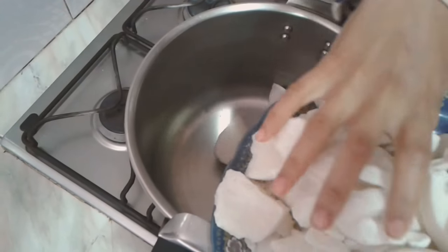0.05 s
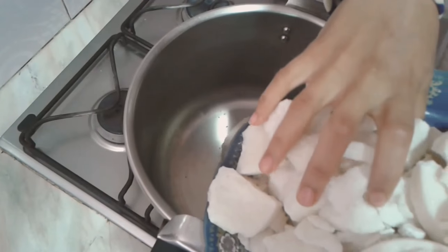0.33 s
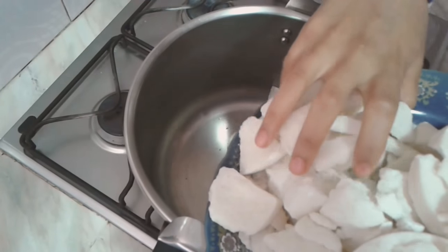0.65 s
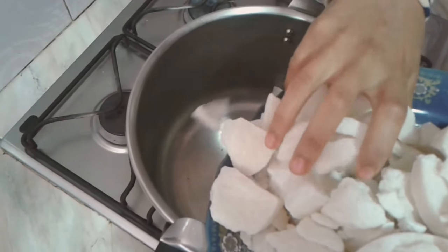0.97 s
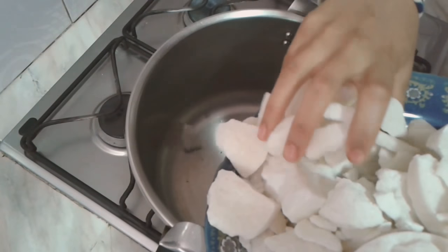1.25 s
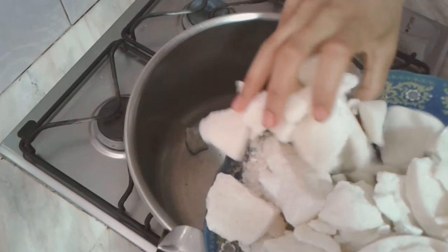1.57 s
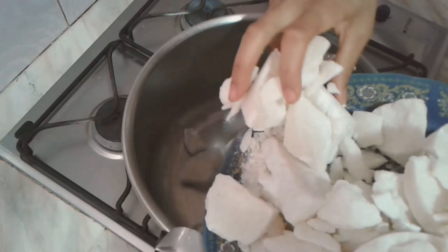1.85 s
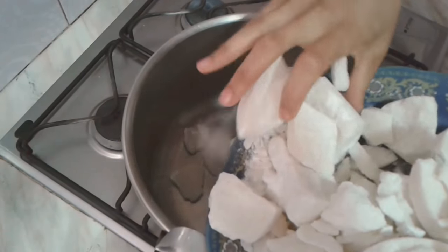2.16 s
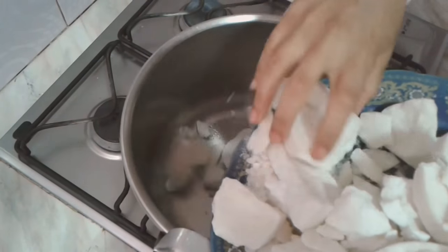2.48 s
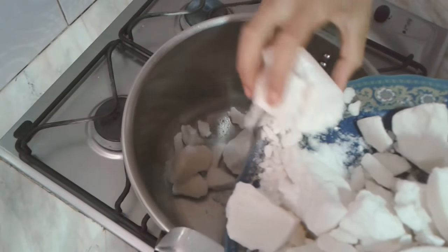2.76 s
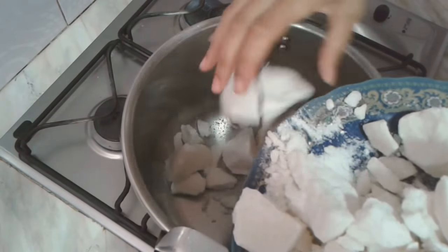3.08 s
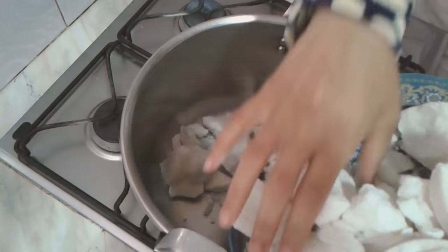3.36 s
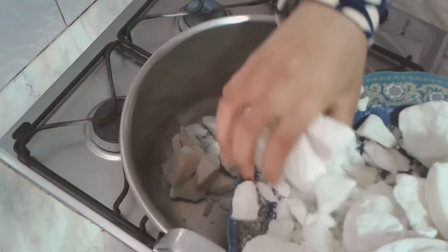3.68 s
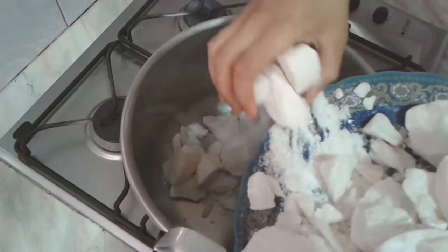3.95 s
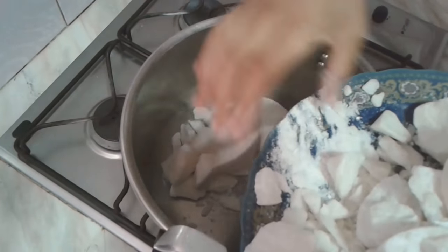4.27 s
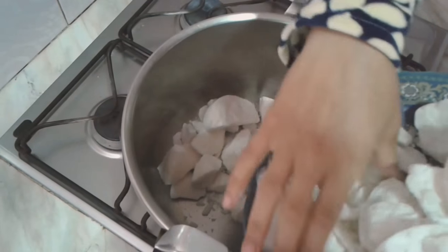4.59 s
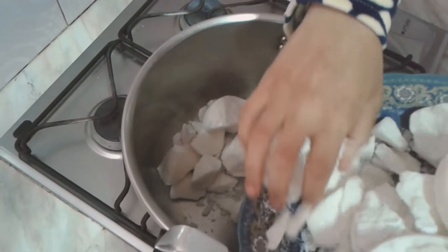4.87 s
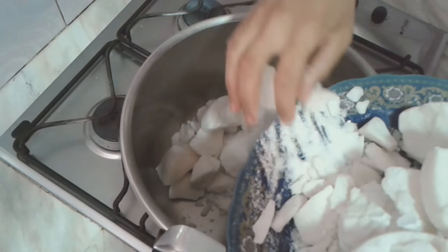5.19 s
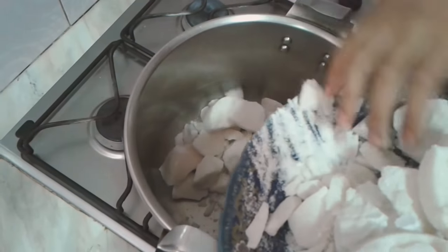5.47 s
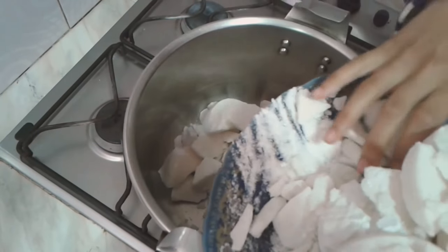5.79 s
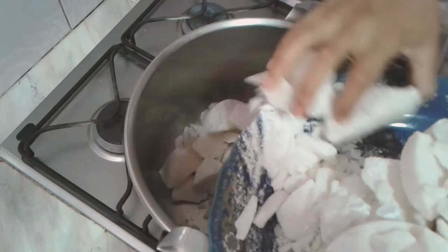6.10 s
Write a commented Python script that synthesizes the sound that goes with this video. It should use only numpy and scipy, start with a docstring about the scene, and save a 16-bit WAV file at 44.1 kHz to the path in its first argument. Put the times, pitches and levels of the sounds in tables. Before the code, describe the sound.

Hard sugar chunks grind and clack across a plate, then tumble into a steel pot with sharp clinks and short metallic rings.

```python
"""A small tiled kitchen: a hand pushes hard chunks of sugar off a plate into a steel pot on the stove.
The chunks grind, clack against each other and squeak on the glaze while loose crumbs trickle down.
Each falling chunk cracks and rings the pot, which dulls as it fills. Now and then the plate knocks
on the rim with a hollow thump. The open pot and the tiles answer with short echoes."""
import sys
import numpy as np
from scipy import signal
from scipy.fft import rfft, irfft, next_fast_len
from scipy.io import wavfile
from scipy.ndimage import uniform_filter1d, map_coordinates

SR = 44100
rng = np.random.default_rng(int(sys.argv[2]) if len(sys.argv) > 2 else 0)


def unload_wav(signal):
    """Save mono or channel-first audio to the path in sys.argv[1] as 16-bit WAV at rate SR, clipped to [-1, 1]."""
    wavfile.write(
        sys.argv[1],
        SR,
        np.round(np.clip(np.atleast_2d(signal).T, -1, 1) * 32767).astype(np.int16),
    )


N = 270553
RING_TIME = np.arange(SR // 2) / SR

# spectrum of a full heap of chunks rubbing together: f/Hz, level/dB
FULL_HEAP_SPECTRUM = [(40, -41), (120, -40), (200, -13.5), (270, -23.5), (345, -13.5), (480, -27.5),
                      (800, -10.5), (1100, -13.5), (1750, -13.5), (2230, -4.5), (2600, -6.5), (3100, -16),
                      (4500, -29), (9000, -55)]
# bright spectrum of sugar grit: f/Hz, level/dB
GRIT_SPECTRUM = [(1500, -5.5), (3400, 0.5), (4900, -3), (6700, 6), (7700, 0), (8400, 6), (9500, -4),
                 (11900, 1), (13400, -4), (16000, -14.5)]


def amp(db):
    return 10 ** (np.asarray(db) / 20)


def unit(x):
    return x / np.sqrt(np.mean(x ** 2) + 1e-20)


def fade(t60):
    """A decay that loses 60 dB in t60 seconds."""
    return np.exp(-np.log(1000) * RING_TIME / t60)


def along(points, hz):
    """Read a curve of (f/Hz, value) points on a log frequency axis."""
    f, value = np.transpose(points)
    return np.interp(np.log(hz + 1), np.log(f), value)


def add(track, s, sound):
    """Mix a sound in at s seconds."""
    start = max(round(s * SR), 0)
    track[start:start + len(sound)] += sound[:N - start]


def colour(x, spectrum):
    """Minimum-phase EQ through (f/Hz, level/dB) points; the result has rms 1."""
    size = 2 ** 12
    gain = amp(along(spectrum, np.fft.rfftfreq(size, 1 / SR)))
    cepstrum = irfft(np.log(gain))
    cepstrum[1:size // 2] *= 2
    cepstrum[size // 2 + 1:] = 0
    impulse = irfft(np.exp(rfft(cepstrum)))
    return unit(signal.fftconvolve(x, impulse)[:len(x)])


def burst(spectrum):
    """Half a second of coloured noise."""
    return colour(rng.standard_normal(len(RING_TIME)), spectrum)


def crest(x):
    """Scale a blow so that its loudest 3 ms have rms 1."""
    return x / np.sqrt(uniform_filter1d(x ** 2, 132).max())


def voice(blow, edges_hz, levels_db):
    """Where and how hard a blow lands sets the strength of each register."""
    registers = [signal.butter(3, band, 'band', fs=SR, output='sos')
                 for band in zip(edges_hz, edges_hz[1:])]
    return sum(amp(db) * crest(signal.sosfilt(sos, blow)) for sos, db in zip(registers, levels_db))


def ring(modes, scatter_db, damping=1):
    """Modes (f/Hz, level/dB, t60/s) struck anew by every blow; damping divides their ring time."""
    hz, db, t60 = np.transpose(modes)[:, :, None]
    gain = amp(db + scatter_db * rng.standard_normal(hz.shape))
    phase = 2 * np.pi * (hz * RING_TIME + rng.random(hz.shape))
    waves = np.sin(phase.astype(np.float32)) * fade(t60 / damping)
    return np.sum(gain * waves, axis=0) / np.linalg.norm(gain)


def grains(per_s, top_hz, t60, spread_db):
    """Tiny fractures at random moments, each with its own size and briefly ringing pitch."""
    when, pitch, size, phase = rng.random((4, int(per_s * N / SR), 1))
    age = np.arange(int(t60 * SR))
    gain = amp(spread_db * np.minimum(-np.log(size), 3))
    waves = gain * np.sin(2 * np.pi * (top_hz * pitch * age / SR + phase)) * fade(t60)[age]
    positions = (when * N).astype(int) + age
    return unit(np.bincount(positions.ravel(), waves.ravel(), minlength=N)[:N])


def strokes(rows, attack_s, release_t60):
    """Envelope of movements that each swell, hold and die away."""
    start, length, db = np.transpose(rows)[:, :, None]
    age = np.arange(N) / SR - start
    swell = np.clip(age / attack_s, 0, 1)
    release = np.exp(-np.log(1000) * np.clip((age - length) / release_t60, 0, 2))
    return np.linalg.norm(amp(db) * swell * release, axis=0)


def wobble(knots_per_s):
    """A smooth random curve."""
    return map_coordinates(rng.standard_normal(N // 100), [np.arange(N) * knots_per_s / SR])


def grinding(t, emptied, plate_db=1, chips_db=-10):
    """Rough faces slip and small edges chip off; the heap sounds higher as the plate empties."""
    # spectrum of the last few chunks: f/Hz, level/dB
    thin_heap_spectrum = [(40, -21), (260, -36), (355, -11), (500, -20.5), (850, -15), (1100, -15.5),
                          (1750, -19), (2450, 0.5), (2700, -11), (3000, -14.5), (4500, -27.5), (9000, -42)]
    # modes of the glazed plate: f/Hz, level/dB, t60/s before damping
    plate_modes = [(2270, 4.5, 0.023), (2480, -22, 0.027), (2740, 6, 0.042), (3200, -4, 0.027),
                   (3550, -4, 0.05), (4310, -14.5, 0.059), (6830, -12, 0.03), (11100, -11, 0.035)]
    slips = grains(per_s=1300, top_hz=4500, t60=.006, spread_db=4.5)
    heap = np.sqrt(1 - emptied) * colour(slips, FULL_HEAP_SPECTRUM)
    heap += np.sqrt(emptied) * colour(slips, thin_heap_spectrum)
    # for a moment the chunks drag over bare glaze, and the plate sings
    bare = np.interp(t, [4.5, 4.7, 5.3, 5.45], [0, .75, .75, 0])
    drag = grains(per_s=2500, top_hz=13000, t60=.002, spread_db=4)
    plate = signal.fftconvolve(drag, ring(plate_modes, scatter_db=1, damping=1.3))[:N]
    plate = colour(plate, [(100, -20), (2000, 0)])
    chips = grains(per_s=130, top_hz=7000, t60=.005, spread_db=5.5)
    chips = colour(chips, [(400, -20), (1500, -2), (3500, 0), (7000, -5)])
    return np.sqrt(1 - bare) * heap + np.sqrt(bare) * amp(plate_db) * plate + amp(chips_db) * chips


def crystals(chips_db=-3, ticks_db=8):
    """Fine sand, crumbly ticks and tinkling chips stir the crowded high modes of the steel."""
    sand = grains(per_s=3000, top_hz=18000, t60=.0015, spread_db=4)
    ticks = grains(per_s=300, top_hz=16000, t60=.002, spread_db=5)
    chips = grains(per_s=2000, top_hz=16000, t60=.009, spread_db=5)
    shower = unit(sand + amp(ticks_db) * ticks + amp(chips_db) * chips)
    high_modes = [(hz, 0, .05) for hz in rng.uniform(3500, 16500, 90)]
    steel = unit(signal.fftconvolve(shower, ring(high_modes, scatter_db=2))[:N])
    return colour(shower + .55 * steel, GRIT_SPECTRUM)


def slide(grind_db=-1, grit_db=-2, powder_db=-5, rest_db=-51.5, fits_db=2,
          shed_db=-14, shed_db_per_s=1.22):
    """The pushed heap grinds in fits, shedding more and more grit as its crumbs are uncovered."""
    # the hand shoving the heap along the plate: t/s, length/s, level/dB
    pushes = [(0, 0.32, -48.5), (.5, 0.26, -38), (.83, .3, -36), (1.27, 0.33, -36.5), (1.57, .3, -28),
              (2.04, 0.14, -31), (2.33, 0.044, -27), (2.66, 0.1, -37.5), (2.83, 0.062, -47),
              (3.12, 0.015, -36), (3.49, 0.31, -43.5), (3.8, 0.46, -42), (4.58, 0.483, -32),
              (4.7, 0.14, -29.5), (5.06, .3, -37), (5.22, 0.032, -27.5), (5.42, 0.15, -33.5),
              (5.73, 0.056, -42), (5.85, 0.24, -31)]
    # loose crumbs trickling into the pot: t/s, length/s, level/dB
    spills = [(0, 0.39, -59.5), (.5, .22, -52), (.84, 0.062, -49), (1.22, 0.028, -29), (2.64, 0.053, -43),
              (2.83, 0.059, -44), (3.11, 0.19, -44), (3.66, 0.029, -35), (3.86, 0.43, -39),
              (4.19, 0.036, -29.5), (4.36, 0.15, -29.5), (5.22, 0.056, -35.5), (5.62, 0.02, -31)]
    # spectrum of the finest crumbs: f/Hz, level/dB
    powder_spectrum = [(2000, -10), (5500, -1), (8500, -6), (10000, -5), (11700, 3), (15500, -10)]
    t = np.arange(N) / SR
    emptied = np.clip((t - 2.4) / 4.02, 0, 1)
    push = strokes(pushes, attack_s=.017, release_t60=.12)
    push = np.hypot(push, amp(rest_db))  # the heap creaks even under a resting hand
    push *= amp(fits_db * wobble(knots_per_s=40))  # rough faces catch and slip
    spill = strokes(spills, attack_s=.011, release_t60=.36)
    grit_flow = np.hypot(amp(shed_db + shed_db_per_s * t) * push, spill)
    grind = amp(grind_db) * push * grinding(t, emptied)
    # powder lies under the chunks and runs out with the crumbs once it is uncovered
    dust = grains(per_s=3000, top_hz=17000, t60=.004, spread_db=4)
    powder = amp(powder_db) * spill * np.sqrt(emptied) * colour(dust, powder_spectrum)
    return grind + amp(grit_db) * grit_flow * crystals() + powder


def chunk_ring():
    """Every chunk has a shape of its own, and so a few short pitches of its own."""
    return ring([(hz, 0, .035) for hz in rng.uniform(2500, 12000, 8)], scatter_db=3)


def clacks(tone_db=-2.5, snap_db=-5, rattle_db=-18):
    """Sugar on sugar, or a chunk tapping the plate: a dry, pitched snap, a bright crack and a brief rattle of
    the heap."""
    # chunks clacking against each other (near 2.3 kHz) or tapping the plate (near 1 kHz): t/s, level/dB, f/Hz,
    # crack/dB relative to the level
    collisions = [(0.024, -23.5, 2330, -29), (0.175, -25, 2300, -32), (0.2403, -15.5, 2250, -36),
                  (0.508, -24.5, 940, -21), (0.684, -15.5, 920, -17), (0.77, -23.5, 2370, -10.5),
                  (0.807, -29.5, 2740, 5), (0.844, -23, 2700, -21), (0.91, -7.5, 2380, -18.5),
                  (0.986, 3.5, 2280, -30.5), (1.1843, 2.5, 1390, -32), (1.482, -19, 2470, -37),
                  (1.528, -16, 2190, -24), (1.607, -10, 2250, -27), (1.636, -6, 2140, -30),
                  (1.681, -8, 2200, -21), (1.704, -5.5, 2180, -23), (1.761, -6.5, 2250, -29),
                  (1.791, -21, 2380, -12), (1.819, -2.5, 2170, -18), (1.835, -7.5, 2530, -37),
                  (2.161, -4, 2360, -19), (2.541, -20, 2380, -15.5), (3.081, -17.5, 1390, -17),
                  (3.477, -9, 2680, -17), (3.771, -7.5, 3120, -19.5), (3.828, -19, 2840, -4),
                  (4.148, -13.5, 2300, -28), (4.709, -9, 2180, -14), (4.735, -6, 2750, -20),
                  (4.81, -11, 3050, -9), (5.383, -16.5, 2400, -17), (5.415, -14, 1080, -17),
                  (5.445, -17, 1090, -13.5), (5.458, -9.5, 1000, -20), (5.49, -6, 1030, -9),
                  (5.732, -13, 2000, -24), (5.999, -10.5, 2600, -24), (6.097, -24, 2530, -35),
                  (6.109, -12, 2630, -19)]
    track = np.zeros(N)
    for s, db, hz, crack_db in collisions:
        tone = np.sin(2 * np.pi * hz * RING_TIME) * (fade(.01) - fade(.001))
        snap = burst([(200, -81), (500, -11), (900, 16.5), (3000, 16.5), (7000, -46.5)]) * fade(.0064)
        rattle = burst(FULL_HEAP_SPECTRUM) * fade(.048)
        crack = crest(burst(GRIT_SPECTRUM) * (fade(.024) + .12 * fade(.28)) + chunk_ring())
        body = amp(tone_db) * tone + amp(snap_db) * snap + amp(rattle_db) * rattle
        add(track, s, amp(db) * (body + amp(crack_db) * crack))
    return track


def squeaks(level_db=-3):
    """A sharp edge skids over the glaze with a thin, narrow whistle."""
    # edges skidding: t/s, level/dB, f/Hz
    skids = [(0.265, -39.5, 10300), (0.604, -27.5, 10200), (3.827, -19.5, 12200), (4.367, -19, 12350),
             (5.079, -23, 11500), (5.4484, -27, 11000), (5.4727, -18.5, 11340), (5.484, -17, 11300),
             (5.506, -10.5, 11400), (5.535, -15, 11500)]
    track = np.zeros(N)
    for s, db, hz in skids:
        whistle = burst([(hz * .9, -40), (hz * .98, -8), (hz, 0), (hz * 1.02, -8), (hz * 1.1, -40)])
        add(track, s, amp(db + level_db) * crest(whistle * fade(.0099)))
    return track


def drops(chunk_db=-6, crack_db=4, shimmer_db=-10, thud_db=-23, wall_db=-2, bottom_db=7,
          damping_per_s=.14, cover_db_per_s=3.5, firm_blow_db=-7.5):
    """A landing chunk cracks, then the pot rings: a few clear modes over many faint ones."""
    # chunks landing: t/s, level/dB, sharpness/dB (+ a corner chinks, - a flat face clangs)
    landings = [(1.182, -8, -4), (1.211, -4.5, 11), (1.285, -16, 1.5), (1.365, -12, -10),
                (1.395, -14.5, -13), (1.873, -20.5, 11), (1.899, -8, 7.5), (1.927, -8, -9),
                (1.938, -0.5, -13), (1.952, -2.5, -4.5), (1.967, -14, 7), (1.984, -4, 9), (1.993, -11, -6),
                (2.004, -10.5, 0.5), (2.026, -12, -2), (2.111, -17.5, -22), (2.118, -15, 8),
                (2.282, -11.5, 7.5), (2.3, -10.5, -9), (2.309, -10, 1.5), (2.333, -10, -1.5),
                (2.41, -20.5, -10), (2.422, -14.5, 3), (2.448, -20, -1), (2.573, -5.5, 2.5),
                (2.591, -7, -1.5), (2.619, -11.5, 27), (2.639, -13, 2.5), (2.654, -19, 5),
                (2.821, -22.5, -11), (2.983, -20.5, 13), (3.265, -17.5, 21), (3.268, -12.5, 1),
                (3.287, -13.5, -3), (3.294, -7, -15), (3.316, -8.5, -8.5), (3.34, -11.5, -9.5),
                (3.398, -19.5, -13.5), (3.652, -11.5, -6), (4.365, -17, -19), (4.378, -10, -27),
                (4.401, -4.5, -8.5), (4.414, -7.5, -23), (4.431, -9, -10), (4.479, -21, 20),
                (4.494, -13.5, 1.5), (4.533, -14.5, -14), (4.542, -8.5, -5.5), (4.583, -15.5, 0.5),
                (4.809, -15, 20), (5.211, -8.5, -12), (5.477, -12.5, -5), (5.49, -8, -13), (5.548, -15, 4),
                (5.608, -4.5, 41)]
    # boom against the clang, rising as a bed of sugar builds, easing once it is deep: t/s, level/dB
    boom_curve = [(1.2, -30), (2.4, -10.5), (3.2, -3.5), (4.4, -5.5)]
    # spectrum of the noisy crash of sugar on steel: f/Hz, level/dB
    crash_spectrum = [(24, -52), (40, -35), (337, -9), (516, -37), (790, -11.5), (1150, -21.5),
                      (1340, -10.5), (1590, -17), (2570, -9), (3300, -23.5), (4570, -18.5), (5050, -29),
                      (6650, -16.5), (9220, -31), (16000, -31)]
    # modes of the pot's wall and of its bare bottom: f/Hz, level/dB, t60/s before damping
    wall_modes = [(755, -7, .16), (800, -3, .18), (851, -8, .25), (930, -6, .1), (1047, -7, .2),
                  (1420, -4, .2), (1749, -6, .25), (1883, -6, .18), (2019, -6, .16), (2238, -1, .17),
                  (2600, -5, .2), (3091, -8, .18), (3531, -6, .14), (4076, -7, .14), (5570, -11, .16),
                  (6350, -7, .17), (6697, -9, .11), (6848, -7, .12), (7305, -11, .2), (7556, -10, .16),
                  (8130, -10, .12)]
    bottom_modes = [(1270, -3, .07), (1346, 0, .24), (1385, -1, .11), (3540, -11, .08), (4544, -7, .12)]
    track = np.zeros(N)
    for s, db, sharp_db in landings:
        clang_db, chink_db = db - max(sharp_db, 0), db + min(sharp_db, 0)
        boom_db = clang_db + np.interp(s, *np.transpose(boom_curve))
        boom_db += .94 * (clang_db - firm_blow_db)  # harder blows boom out of proportion
        damping = .9 + damping_per_s * s  # the growing pile damps the steel
        decay = amp(crack_db) * fade(.022) + fade(.055) + amp(shimmer_db) * fade(.17 / damping)
        crash = burst(crash_spectrum) * decay
        wall = amp(wall_db) * ring(wall_modes, scatter_db=0, damping=damping)
        # a flat face rings the bottom best; it fades as the sugar covers it
        bottom_gain = amp(bottom_db - cover_db_per_s * s - .22 * sharp_db)
        bottom = bottom_gain * ring(bottom_modes, scatter_db=5, damping=damping)
        blow = crash + wall + bottom + amp(chunk_db) * chunk_ring()
        levels_db = (db + thud_db, boom_db, clang_db, chink_db)
        add(track, s, voice(blow, (30, 700, 1100, 3500, 17000), levels_db))
    return track


def knocks(modes_db=-1, chink_db=-5):
    """The heavy plate rocks the whole pot with a hollow thump."""
    # the plate bumping the rim: t/s, clang level/dB, thump/dB relative to the clang
    bumps = [(3.005, -27, -5), (3.027, -22.5, -12.5), (3.041, -31, -8), (3.595, -22, -3.5),
             (4.337, -24.5, -10), (5.017, -16.5, -7.5), (5.209, -30, -3)]
    # plate and pot rocking together on the grate: f/Hz, level/dB, t60/s
    rocking_modes = [(333, 0, .17), (374, 1, .18), (463, -6, .14), (540, -7, .06), (790, -4, .13),
                     (931, -6, .25), (1125, -8, .11), (1443, -9, .14), (2230, -3, .14)]
    contact_spectrum = [(230, -1), (350, 1.5), (900, 1.5), (2400, -.5), (7000, -6), (16000, -22.5)]
    track = np.zeros(N)
    for s, db, thump_db in bumps:
        contact = burst(contact_spectrum) * (2 * fade(.009) + fade(.12))
        blow = contact + amp(modes_db) * ring(rocking_modes, scatter_db=1)
        add(track, s, amp(db) * voice(blow, (160, 700, 3500, 17000), (thump_db, 0, chink_db)))
    return track


def pot_echo(x, t60=.045):
    """Sound bounces to and fro inside the open pot."""
    echoes = np.pad(burst(GRIT_SPECTRUM) * fade(t60), (SR // 500, 0))  # 2 ms pre-delay
    return signal.fftconvolve(x, echoes / np.linalg.norm(echoes))[:N]


def kitchen_reverb(x):
    """Tiles return a short tail, each frequency dying at its own speed."""
    # decay of the tiled room: f/Hz, t60/s
    decay_times = [(150, 1), (1000, 0.5), (5000, 0.54), (15000, 0.078)]
    hz, t, noise = signal.stft(rng.standard_normal(SR // 2), SR, nperseg=256)
    decay = np.exp(-np.log(1000) * t / along(decay_times, hz)[:, None])
    _, tail = signal.istft(noise * decay, SR, nperseg=256)
    tail = np.pad(tail / np.linalg.norm(tail), (SR // 200, 0))  # 5 ms pre-delay
    return signal.fftconvolve(x, tail)[:N]


def scene(drops_db=-5.5, knocks_db=4, pot_echo_db=-7, reverb_db=-14, room_tone_db=-62):
    """All contacts and their echoes over a faint room tone, in mono."""
    # spectrum of the quiet kitchen: f/Hz, level/dB
    room_spectrum = [(18, -36), (30, 0), (540, 15.5), (760, -2.5), (2350, 10), (5040, -51), (7270, -29),
                     (16000, -35)]
    contacts = amp(drops_db) * drops() + amp(knocks_db) * knocks() + clacks() + squeaks() + slide()
    room_tone = amp(room_tone_db) * colour(rng.standard_normal(N), room_spectrum)
    echoes = amp(pot_echo_db) * pot_echo(contacts) + amp(reverb_db) * kitchen_reverb(contacts)
    return (contacts + echoes + room_tone)[None]


def record(dry, top_hz=16100):
    """Soft-clip the highest peaks and cut everything above top_hz."""
    rounded = dry / (1 + np.abs(dry) ** 6) ** (1 / 6)
    size = next_fast_len(N + SR // 2)
    passband = np.fft.rfftfreq(size, 1 / SR) < top_hz
    return irfft(rfft(rounded, size) * passband, size)[:, :N]


dry = scene()
out = record(dry)
unload_wav(out)
```